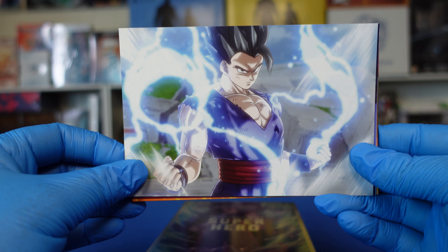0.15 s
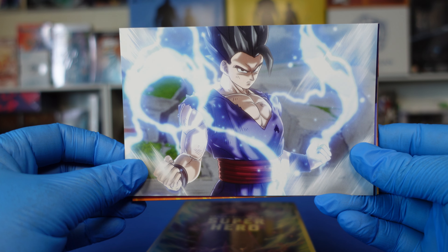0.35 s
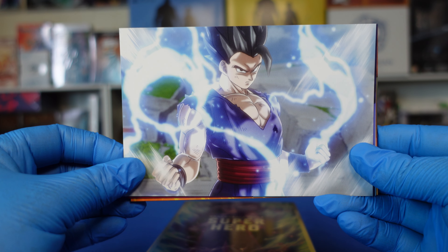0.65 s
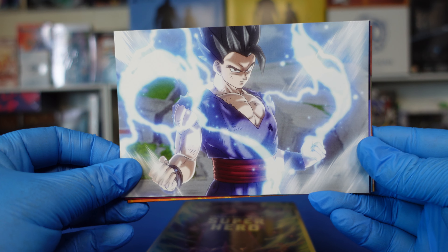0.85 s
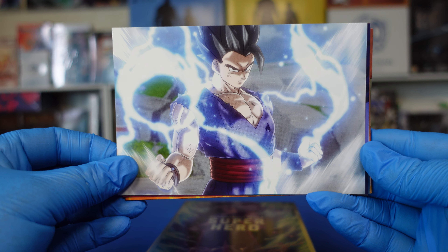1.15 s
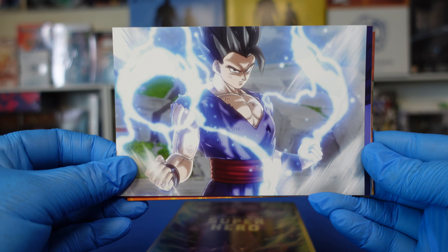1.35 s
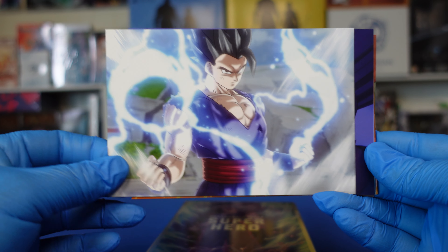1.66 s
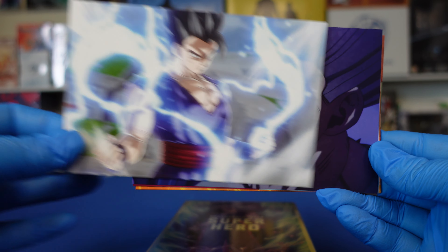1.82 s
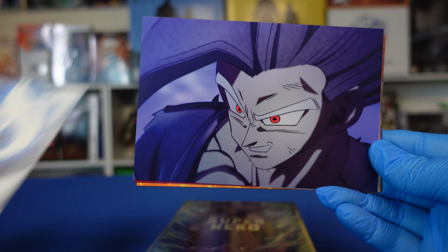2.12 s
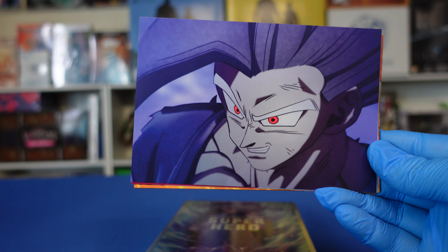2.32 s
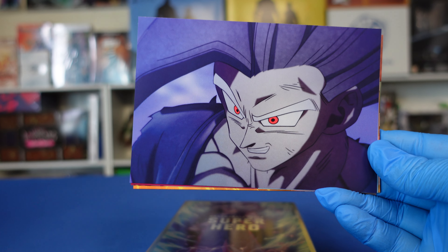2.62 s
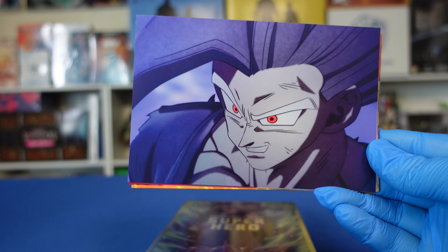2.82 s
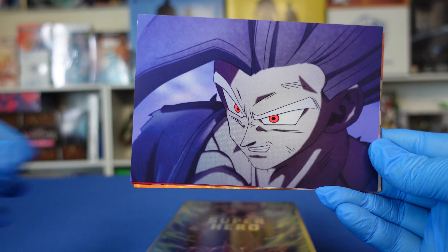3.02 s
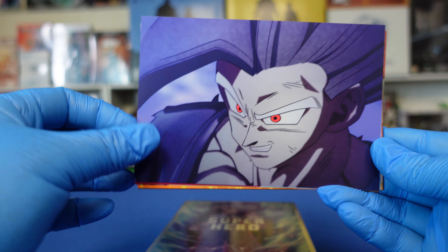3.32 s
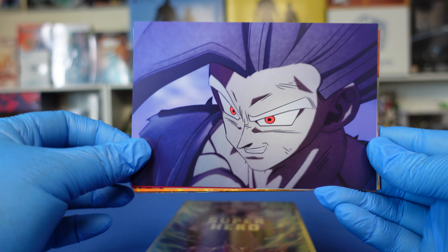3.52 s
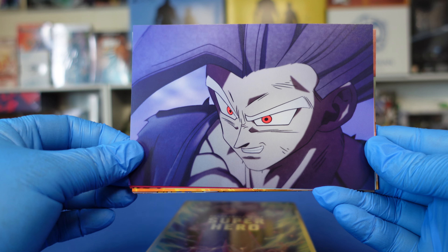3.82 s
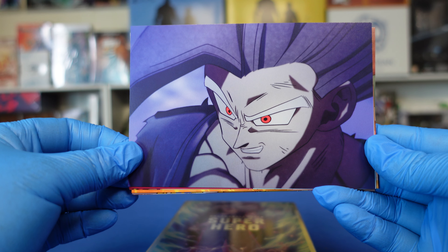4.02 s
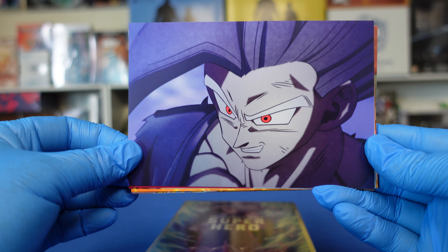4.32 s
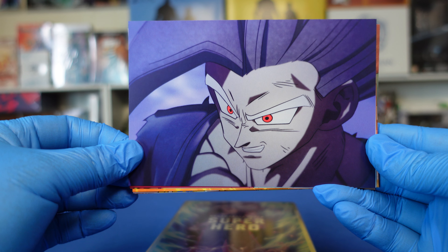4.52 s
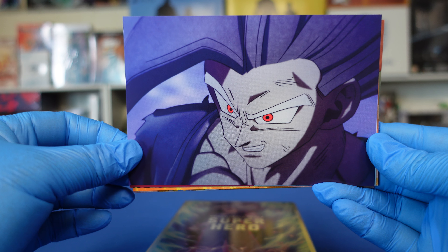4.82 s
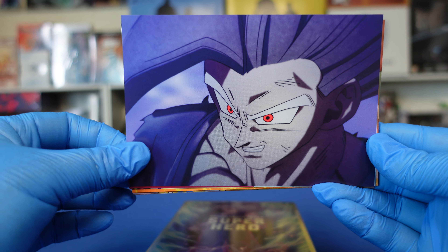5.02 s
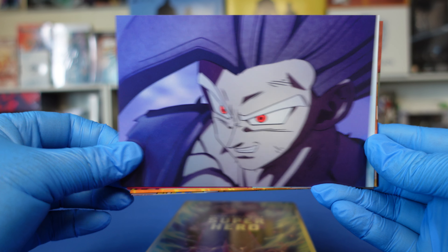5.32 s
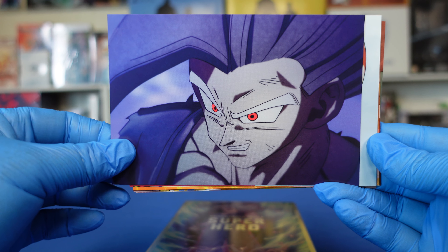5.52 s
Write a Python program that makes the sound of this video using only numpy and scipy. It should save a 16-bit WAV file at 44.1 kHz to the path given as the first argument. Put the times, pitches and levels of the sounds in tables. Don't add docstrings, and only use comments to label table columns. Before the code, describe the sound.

Dry card rubbing and tiny clicks lead to a hard, bright snap midway, then sparse ticks and a final squeaky snap over faint room noise.

```python
import sys
import numpy as np
from scipy import signal
from scipy.fft import rfft, irfft, next_fast_len
from scipy.io import wavfile

SR = 44100
rng = np.random.default_rng(int(sys.argv[2]) if len(sys.argv) > 2 else 0)


def volts_from_decibels(level):
    exponent = np.asarray(level, float) / 20
    return 10 ** exponent


def pcm_store(signal):
    levels = np.round(np.clip(np.atleast_2d(signal), -1, 1) * 32767)
    wavfile.write(sys.argv[1], SR, levels.astype(np.int16).T)


N = 249606

# start in seconds, peak in seconds, end in seconds, peak level in dB,
# brightness (high minus low ring) in dB.
FACE_STROKES = [
    (0.704, 0.757, 0.94, -47.5, -9),
    (0.762, 0.848, 0.88, -44.5, -2),
    (.86, 0.876, 1.18, -55, 2),
    (0.993, 1.034, 1.3, -62.5, -5),
    (1.32, 1.487, 1.5, -55.5, -1),
    (1.65, 1.672, 1.72, -48, 1),
    (1.682, 1.748, 1.83, -45, 0),
    (1.758, 1.807, 1.848, -45, -4),
    (1.902, 1.924, 1.945, -48, -9),
    (3.401, 3.432, 3.455, -51, 1),
]
EDGE_STROKES = [
    (1.947, 2.086, 2.136, -52, 2.5),
    (2.448, 2.47, 2.52, -43, 3),
    (2.46, 2.49, 2.7, -41, -1),
    (2.471, 2.557, 2.561, -32, -4.5),
    (2.555, 2.566, 2.61, -42, -12.5),
    (2.584, 2.598, 2.65, -32.5, -8.5),
    (2.602, 2.632, 2.66, -34, 1),
    (2.65, 2.692, 3, -58, -2),
]
THUMB_STROKES = [
    (0.423, 0.483, 0.77, -60.5, 13),
    (1.787, 1.877, 1.892, -42, -2.5),
    (1.87, 1.895, 1.93, -51, -2),
    (3.495, 3.63, 4, -62, -1),
    (3.74, 3.8, 3.97, -63, -12),
    (4.567, 4.71, 4.89, -52, 5),
    (4.865, 4.88, 4.905, -54.5, 6),
    (5.344, 5.356, 5.53, -47.5, 0),
    (5.397, 5.4, 5.46, -46.5, 12),
]
LOOSE_STROKES = [
    (1.93, 1.973, 2.07, -60.5, -11),
    (2.108, 2.227, 2.276, -46, -4.5),
    (2.296, 2.357, 2.5, -51, -6),
    (5.563, 5.585, 5.8, -56.5, -5),
]
BRUSH_STROKES = [
    (.98, 1.074, 1.35, -62.5, 1),
    (1.186, 1.208, 1.25, -58, -3),
    (1.253, 1.293, 1.64, -57, -4),
    (1.335, 1.42, 1.45, -55, -2),
    (2.106, 2.125, 2.22, -57.5, 3),
    (2.13, 2.205, 2.25, -59.5, 15),
    (2.467, 2.555, 2.56, -54, 2),
    (2.607, 2.619, 2.64, -41.5, 0),
]
BOWED_STROKES = [
    (1.431, 1.552, 1.64, -42, 9),
    (1.534, 1.596, 1.674, -36, -1),
    (1.585, 1.641, 1.672, -38, -15.5),
    (5.458, 5.465, 5.55, -47.5, 0),
    (5.461, 5.534, 5.6, -43, 9),
    (5.504, 5.575, 5.58, -47, 4.5),
]
STROKE_RISE_DB, STROKE_FALL_DB = 17.5, 17

# low mode in Hz, middle mode in Hz,
# high mode in Hz, low ring level in dB, high ring level in dB.
GRIPS = [(2900, 6600, 14800, -2.5, -4), (2500, 4500, 11000, -3, -3), (3100, 8600, 13900, -3, -2.5),
         (2100, 5400, 11200, -1.2, -2.5), (3000, 7800, 14200, -9, 7.5), (3450, 5830, 10300, -2.5, -5)]
GRIP_WIDTH_HZ, GRIP_DB = [550, 500, 900], [5, 6, 3]

# frequency in Hz, width in Hz, level over the broad band in dB.
LOW_RING = [(1650, 400, -6), (2750, 350, 1.5), (3450, 350, -1.5)]
MIDDLE_RING = [(5920, 910, 7.2), (7210, 610, 2.3), (8500, 1800, 0.28)]
HIGH_RING = [(11440, 390, 0.43), (13450, 1300, 3.7)]
# lower edge in Hz, upper edge in Hz.
RING_EDGES_HZ = [(1000, 4250), (4550, 9500), (9500, 18500)]

# time in seconds, peak level in dB, brightness (high minus low) in dB, own ring in Hz.
TICKS = [(0.851, -23.5, -10, 4520), (1.3555, -24, -16, 2850), (1.4556, -32, -16, 7700),
         (1.6584, -30, -9, 3350), (1.6733, -29, -9, 6530), (1.7174, -25, -11, 3290),
         (1.791, -21, -10, 5970), (1.7984, -34, -5, 3060), (1.8363, -24, -12, 5940), (2.0827, -32, 5, 4370),
         (2.112, -23, 5, 7060), (2.1547, -28.5, 26, 12100), (2.2433, -26, 21, 5030),
         (2.4025, -26, -3, 2240), (2.4564, -27, 10, 5850), (3.256, -23.5, 5, 2370), (3.4286, -33, -7, 6040),
         (3.4993, -32.5, -17, 2600), (3.5484, -31.5, 16, 2450), (3.621, -36, 24, 13000),
         (3.632, -35.5, -22, 3050), (3.7798, -31, -18, 2540), (3.7937, -31.5, 20, 3020),
         (3.8135, -27.5, 5, 3520), (3.972, -35, 4, 9600), (4.6797, -34, -16, 6900),
         (4.9665, -31.5, 2, 2600), (5.3844, -31, -13, 3010), (5.4384, -23, -15, 5700),
         (5.462, -23, 2, 2750)]
# time in seconds, peak level in dB, brightness in dB, own ring in Hz, length in ms.
SNAPS = [(1.7455, -14, 0, 6100, 0.53), (1.9166, -18, -18.5, 6250, 0.45), (1.924, -23.5, -7, 2760, 0.8),
         (2.3643, -21, -16, 1930, .82), (2.597, -21, -8, 2650, .95), (2.625, -2.5, -6, 7200, 0.56),
         (2.629, -6, 10, 2750, 1), (2.6353, -23, 10, 7400, .7), (5.353, -14.5, -8, 3200, 0.38),
         (5.3562, -12.5, 6, 8600, 0.52), (5.3616, -11, 8, 6100, 0.66), (5.363, -10, 6, 8440, 0.5)]
# start in seconds, first gap in ms, gap growth per slip as a ratio,
# first peak level in dB, own ring in Hz.
STALLS = [
    (1.053, 8.6, 1.028, -33, 3160),
    (1.7272, 5.1, 1.19, -20, 3100),
    (5.317, 6.4, 1.03, -31, 8600),
    (5.5746, 5.9, 1.21, -19.5, 1860),
]
STALL_SLIPS = [7, 7, 6, 6]
STALL_BRIGHT_DB, STALL_LOSS_DB, STALL_UNEVEN_DB = [1, -2, 7, -7], [.1, 0.27, -0.18, 2.2], 2.5
SLIP_MS, OUTER_RINGS_DB = 0.62, -6

# time in seconds, slip rate in Hz, level in dB.
SQUEAKS = [
    [(1.492, 3486, -53), (1.506, 3450, -35), (1.52, 3100, -45), (1.535, 3300, -41), (1.555, 3450, -35),
     (1.567, 2900, -37), (1.577, 2004, -39), (1.59, 1850, -38), (1.597, 1407, -62)],
    [(5.398, 4630, -53), (5.401, 3930, -41), (5.408, 2410, -42), (5.414, 1850, -38.5), (5.423, 1846, -38),
     (5.429, 1520, -52)],
    [(5.463, 1208, -57), (5.48, 1410, -46.5), (5.49, 1835, -37.5), (5.505, 2045, -36.5), (5.52, 2655, -38),
     (5.533, 2750, -34), (5.54, 2220, -46)],
]
# start in seconds, end in seconds, first rate in Hz, last rate in Hz,
# level in dB.
BRAKES = [
    (1.6, 1.661, 1950, 849, -32.5),
    (2.598, 2.619, 1810, 1495, -32.5),
    (5.54, 5.556, 2153, 1500, -32.5),
    (5.554, 5.575, 1393, 1006, -39.5),
]
BRAKE_EDGE_S, BRAKE_EDGE_DB, BRAKE_FADE_DB = 0.0017, 13, 7
# frequency in Hz, level in dB.
SQUEAK_COLOUR = [(500, -10), (1100, -4), (1900, -4), (3300, 1.5), (4500, -9), (5700, -2), (7500, -9),
                 (11000, -18)]

# time in seconds, peak level in dB, pitch in Hz, 60 dB decay time in seconds.
THUDS = [
    (1.915, -40, 752, 0.049),
    (1.924, -30.5, 533.2, 0.02),
    (1.97, -35.5, 292, 0.023),
    (2.366, -31, 1840, 0.015),
    (2.547, -49, 188, 0.047),
    (2.631, -14, 1360, 0.0055),
    (2.632, -36.5, 180, 0.049),
    (2.651, -47, 150, 0.081),
    (5.353, -41, 651, 0.017),
]

# time in seconds, left over right level in dB.
PLACE = [(0, 1), (.9, -0.3), (1.7, -0.2), (2.13, 3.5), (2.43, 5.5), (2.69, 4), (2.8, 1.5), (5.66, .5)]
ROOM_FADE_S, ROOM_WET_DB = .17, -9.5
# time in seconds, level in dB.
RUMBLE = [(0.0, -68), (0.39, -65), (0.69, -55), (0.99, -60), (1.18, -63), (1.43, -72), (1.87, -61),
          (2.2, -72), (2.55, -55), (3.14, -92), (3.53, -68), (3.66, -58), (3.85, -56.5), (3.95, -69),
          (4.48, -81), (5.66, -78)]
HUM_FOLLOWS, STILL_DB = 0.11, -80.5
# frequency in Hz, density in dB per Hz.
ROOM = [(30, -63), (90, -25.5), (233, -14.5), (449, -5), (1010, -1.5), (2230, -2), (3400, -9.5),
        (14400, -14)]
ROOM_DB = -54.5
# frequency in Hz, left-right likeness from 0 to 1.
LIKENESS = [(60, 0.9), (240, 0.49), (950, 0.53), (3770, 0.52), (15000, 0.73)]
MIC_LOW_HZ, MIC_TOP_HZ = 130, 15950


def rms_one(x):
    return x / np.sqrt(np.mean(x ** 2) + 1e-20)


def in_time(rows, outside):
    s, *columns = np.transpose(rows)
    return np.array([np.interp(np.arange(N) / SR, s, c, outside, outside) for c in columns])


def at_hz(points, hz):
    points = np.array(points)
    return np.interp(np.log(hz), np.log(points[:, 0]), points[:, 1])


def drift(rate):
    r = np.exp(-32 * np.pi * rate / SR)
    white = rng.standard_normal(N // 16 + 2002)
    slow = signal.lfilter([1], [1, -2 * r, r * r], white)[2000:]
    return np.interp(np.arange(N) / 16, np.arange(len(slow)), rms_one(slow))


def band(x, low_hz, high_hz, order=2):
    return signal.sosfilt(signal.butter(order, [low_hz, high_hz], "band", fs=SR, output="sos"), x)


def above(x, low_hz):
    return signal.sosfilt(signal.butter(3, low_hz, "high", fs=SR, output="sos"), x + 1e-18)


def rubbing(per_s, spread_db, smooth, clump_db):
    sizes = volts_from_decibels(spread_db * np.minimum(rng.exponential(1, N), 3)) * rng.choice([-1, 1], N)
    slips = rms_one(sizes * (rng.random(N) < per_s / SR))
    force = rms_one((slips + smooth * rng.standard_normal(N)) * volts_from_decibels(clump_db * drift(110)))
    forces = [force * volts_from_decibels(0.66 * drift(31)) for k in range(3)]
    out = np.zeros(N)
    by_grip = [FACE_STROKES, EDGE_STROKES, THUMB_STROKES, LOOSE_STROKES, BRUSH_STROKES, BOWED_STROKES]
    for strokes, (*grip_hz, low_db, high_db) in zip(by_grip, GRIPS):
        power = np.zeros((3, N))
        for start, peak, end, db, bright_db in strokes:
            gone = 2 * end - peak
            span = slice(round(start * SR), round(gone * SR))
            t = np.arange(N)[span] / SR
            levels_db = [db - STROKE_RISE_DB, db, db - 2 * STROKE_FALL_DB]
            swell_db = np.interp(t, [start, peak, gone], levels_db)
            tilt_db = np.array([[low_db - bright_db / 2], [0], [high_db + bright_db / 2]])
            power[:, span] += volts_from_decibels(swell_db + tilt_db) ** 2
        for k in range(3):
            grip = [(grip_hz[k], GRIP_WIDTH_HZ[k], GRIP_DB[k])]
            out += card_ring(forces[k] * np.sqrt(power[k]), index=k, grip=grip)
    return out


def card_ring(force, index, grip=()):
    modes = [*(LOW_RING, MIDDLE_RING, HIGH_RING)[index], *grip]

    def shape(x):
        x = band(x + 1e-18, *RING_EDGES_HZ[index], order=3)
        out = 0.51 * x
        for hz, width_hz, db in modes:
            r = np.exp(-np.pi * width_hz / SR)
            zeros = np.array([1, 0, -1]) * (1 - r * r) / 2
            poles = [1, -2 * r * np.cos(2 * np.pi * hz / SR), r * r]
            out = out + volts_from_decibels(db) * signal.lfilter(zeros, poles, x)
        return out

    energy = np.sum(shape(signal.unit_impulse(2048)) ** 2)
    return shape(force) / np.sqrt(energy)


def ticks(own_db, own_ms):
    length = 600
    force, own = np.zeros((3, N + length)), np.zeros(N + length)
    age_ms = np.arange(length) / SR * 1000
    rows = [(*row, SLIP_MS) for row in TICKS] + SNAPS + stalls()
    chatter = rng.standard_normal((len(rows), length))
    for (s, db, bright_db, hz, ms), noise in zip(rows, chatter):
        span = slice(round(s * SR), round(s * SR) + length)
        ms = max(ms, .1)
        low_db, high_db = OUTER_RINGS_DB - bright_db / 2, OUTER_RINGS_DB + bright_db / 2
        jolt = 0.54 * noise * (1 - np.exp(-age_ms / 0.17)) * np.exp(-age_ms / ms)
        force[:, span] += volts_from_decibels(db - 3.5 + np.array([[low_db], [0], [high_db]])) * jolt
        loudest_db = db + max(low_db, 0, high_db)
        tone = np.sin(2 * np.pi * hz * age_ms / 1000) * np.exp(-age_ms / (own_ms * ms))
        own[span] += volts_from_decibels(loudest_db + own_db) * tone
    return (own + sum(card_ring(f, index=k) for k, f in enumerate(force)))[:N]


def stalls():
    rows = []
    settings = zip(STALLS, STALL_SLIPS, STALL_BRIGHT_DB, STALL_LOSS_DB)
    for (s, gap_ms, growth, first_db, hz), count, bright_db, loss_db in settings:
        for k in range(count):
            late_ms = gap_ms * (growth ** k - 1) / (growth - 1)
            db = first_db - loss_db * k + STALL_UNEVEN_DB * rng.standard_normal()
            rows.append((s + late_ms / 1000, db, bright_db, hz, SLIP_MS))
    return rows


def squeaks(wobble, jitter, uneven_db, blur, falloff_db):
    out = np.zeros(N)
    shake = 1 + wobble * drift(185) + jitter * drift(1210)
    flutter_db = uneven_db * (drift(150) + 0.11 * drift(1000))
    slack = drift(500)
    for rows in SQUEAKS + brakes():
        span = slice(round(rows[0][0] * SR) + 1, round(rows[-1][0] * SR) - 1)
        hz, db = in_time(rows, 0)[:, span]
        hz = hz * shake[span]
        phase = 2 * np.pi * np.cumsum(hz) / SR
        for k in range(1, 13):
            level_db = db + flutter_db[span] + at_hz(SQUEAK_COLOUR, k * hz) - falloff_db * np.log2(k)
            wander = blur * np.sqrt(k) * np.roll(slack, 997 * k)[span]
            out[span] += volts_from_decibels(level_db) * (k * hz < SR / 3) * np.cos(k * phase + wander)
    return out


def brakes():
    curves = []
    for start, end, first_hz, last_hz, db in BRAKES:
        s = np.array([start, start + BRAKE_EDGE_S, end - BRAKE_EDGE_S, end])
        hz = np.interp(s, [start, end], [first_hz, last_hz])
        level_db = db - np.array([BRAKE_EDGE_DB, 0, BRAKE_FADE_DB, BRAKE_FADE_DB + BRAKE_EDGE_DB])
        curves.append(np.transpose([s, hz, level_db]))
    return curves


def thuds():
    out, age = np.zeros(N), np.arange(SR // 5) / SR
    for s, db, hz, t60 in THUDS:
        onset = 1 - np.exp(-age * hz * 2.83)
        mode = np.sin(2 * np.pi * hz * age) * volts_from_decibels(db - 60 * age / t60) * onset
        out[round(s * SR):round(s * SR) + len(age)] += mode
    return out


def pan(x):
    left_right_db = in_time(PLACE, 0)[0]
    return x * volts_from_decibels(np.array([left_right_db / 2, -left_right_db / 2]))


def room(x):
    size = next_fast_len(N + SR)
    hz = np.arange(size // 2 + 1) * SR / size
    lags_s = rng.uniform(0.0035, .03, (2, 8))
    out = []
    for side in lags_s:
        response = 0
        for k, lag in enumerate(side):
            loop = volts_from_decibels(-60 * lag / ROOM_FADE_S * (3 + hz / 9000)) * np.exp(-2j * np.pi * hz * lag)
            response = response + (-1) ** k * loop / (1 - loop)
        out.append(irfft(rfft(x, size) * response, size)[:N])
    return np.array(out)


def rumble():
    lumpy = band(rng.standard_normal(N), 161, 490, order=3) * volts_from_decibels(0.77 * drift(6.3))
    return rms_one(lumpy) * volts_from_decibels(in_time(RUMBLE, -90)[0] - 10.5)


def room_tone(patchy_db):
    out, edges = 0, 25 * 2 ** np.arange(0, 9.6, .5)
    white = rng.standard_normal((2, 2, N))
    hum_db = HUM_FOLLOWS * (in_time(RUMBLE, STILL_DB)[0] - STILL_DB)
    for k, (low, high) in enumerate(zip(edges, edges[1:])):
        centre = np.sqrt(low * high)
        mid, side = band(white[k % 2], low, high)
        alike = np.clip(at_hz(LIKENESS, centre), 0, 1)
        swell_db = (hum_db + patchy_db * drift(8)) * (high < 1300)
        gain = volts_from_decibels(at_hz(ROOM, min(centre, 13500)) + swell_db)
        out = out + gain * (np.sqrt(1 + alike) * mid + np.sqrt(1 - alike) * side * [[1], [-1]])
    return rms_one(out) * volts_from_decibels(ROOM_DB + 1.48)


def scene():
    slips = ticks(own_db=-10.0, own_ms=1.73)
    squeak = squeaks(wobble=.06, jitter=.04, uneven_db=2.5, blur=.33, falloff_db=.6)
    rub = rubbing(per_s=5000.0, spread_db=4.0, smooth=.8, clump_db=1.6)
    hands = rub + above(slips, 1400) + above(squeak, 610) + above(thuds(), MIC_LOW_HZ)
    return pan(hands) + volts_from_decibels(ROOM_WET_DB) * room(hands) + rumble() + room_tone(patchy_db=2.0)


def roll_off(x):
    return signal.sosfilt(signal.butter(12, 16200, fs=SR, output="sos"), x)


def record(dry):
    rounded = above(.7 * np.tanh(dry / .7), 45)
    top_cut = signal.ellip(10, .3, 60, MIC_TOP_HZ, fs=SR, output="sos")
    mix = signal.sosfilt(top_cut, rounded)
    return roll_off(mix)


dry = scene()
out = record(dry)
pcm_store(out)
```